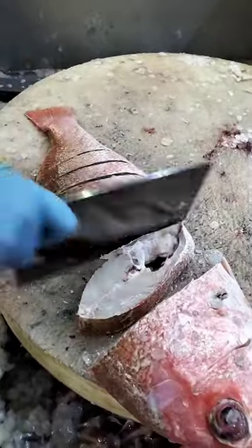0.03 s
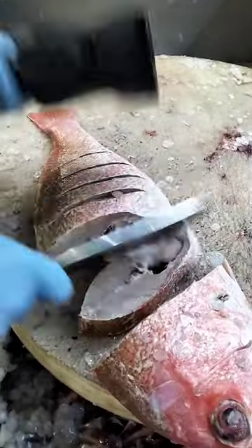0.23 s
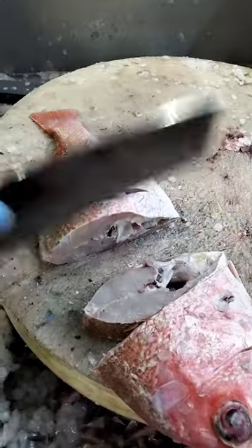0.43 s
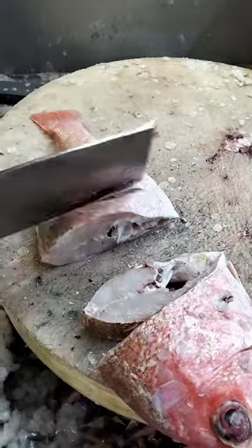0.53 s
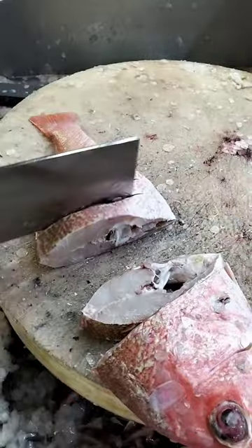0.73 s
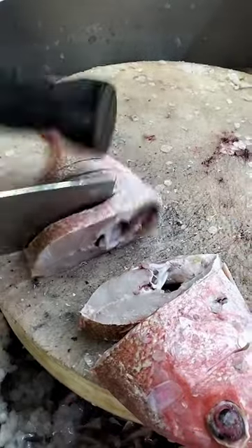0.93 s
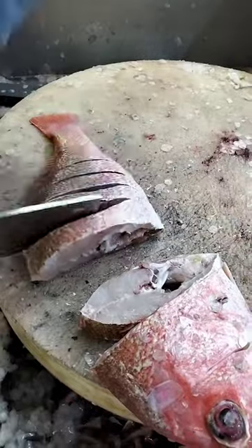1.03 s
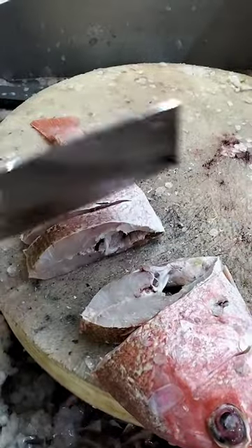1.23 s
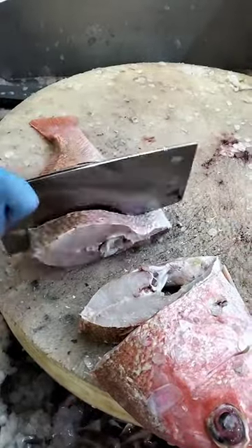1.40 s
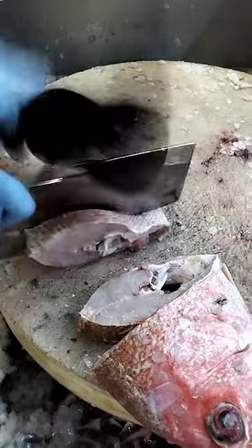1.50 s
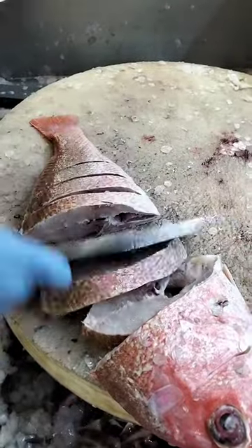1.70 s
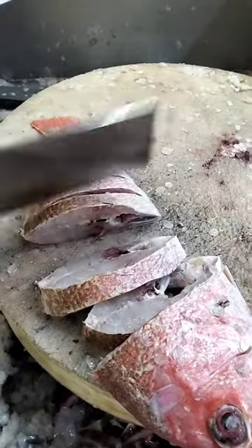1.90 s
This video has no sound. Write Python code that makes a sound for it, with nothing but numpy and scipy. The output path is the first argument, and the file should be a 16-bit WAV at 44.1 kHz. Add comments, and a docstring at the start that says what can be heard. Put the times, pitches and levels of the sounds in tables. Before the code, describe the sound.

Three hard chops crack through fish bone into a wooden block, ringing briefly in a small room

```python
"""Cleaver through a fish

A mallet drives a heavy cleaver through a fish on a thick wooden block, three times, in a small hard room.
Each blow cracks bone (noise bursts), knocks and rings blade and block (fading sines), carries low noise
that holds briefly and drops, and fills the room (fading noise). Between blows the blade slides over wet
scales (grainy noise, ticks). An earlier blow's tail opens the scene; the fish bumps softly (low noise).
Low rumble and hum lie behind; a limiter holds the peaks, then the top is cut.
"""
import sys
import numpy as np
from scipy import signal
from scipy.fft import rfft, irfft
from scipy.io import wavfile
from scipy.ndimage import uniform_filter1d, minimum_filter1d

SR = 44100
rng = np.random.default_rng(int(sys.argv[2]) if len(sys.argv) > 2 else 0)


def master_out(mix):
    """Clip the mix to full scale and print it as 16-bit PCM to the path in sys.argv[1]."""
    frames = np.transpose(np.atleast_2d(mix))
    ceiling = np.clip(frames, -1, 1)
    pcm = np.round(ceiling * 32767).astype(np.int16)
    wavfile.write(sys.argv[1], SR, pcm)


N = 85995
T = np.arange(N) / SR  # time in seconds
HZ = np.maximum(np.fft.rfftfreq(N, 1 / SR), 1)  # frequency of each spectrum bin, kept above 0 for logs

# Levels are relative: the layers add up, and colours and layer levels multiply.
# t60 is the time a sound takes to fade by 60 dB.

# Blows [t/s, level/dB, knock level/dB, blade level/dB, then one colour level/dB per BLOW_COLOUR_HZ];
# the colour depends on where the edge lands
BLOWS = [(0.2076, 1, 0.5, -10, 2.5, 2.8, -2, -5, -2.5, -7, -7.5),
         (0.9100, 1, -0.5, -3.5, -5, 1.1, -1, 1.5, -1.5, -0.5, -1.5),
         (1.5356, 0.018, 2, 1, 2.5, -1.8, 1.5, 1.5, 3.5, 2, 0.5)]
# Where the blow colours act [f/Hz]
BLOW_COLOUR_HZ = [90, 150, 350, 700, 1050, 1500, 4500]

# Dead knock of the blade bedding into the wood [f/Hz, level/dB, t60/s]
KNOCK_MODES = [(171, -4, 0.045), (228.6, -7.5, 0.066), (408, -9, 0.11), (668, -9, 0.067),
               (719.7, -9.5, 0.086), (907, -25, 0.055), (1036, -7, 0.052), (1254, -15, 0.06),
               (1549, -14, 0.042), (1716, -19, 0.1), (2258, -25.5, 0.1), (2360, -27, 0.07),
               (2888, -14.5, 0.027), (3240, -50, 0.021)]
# Contact noise of the knock [f/Hz, level/dB]
KNOCK_NOISE = [(30, 15), (120, -4), (300, -28), (700, 14), (1450, 5.5), (2000, -9), (3300, 2), (5000, -5.5),
               (16000, -64)]
KNOCK_NOISE_DB, KNOCK_NOISE_T60_S, KNOCK_RISE_S = -10.5, 0.042, 0.00038

# Low ring of block and bench [f/Hz, level/dB, t60/s]
BLOCK_MODES = [(74, -22, .9), (93, -7, .5), (134, -6, .36), (186, -12, .3), (219, -9, .38), (317, -10, .32),
               (393, -21, .35), (431, -20, .3), (571, -17, .35), (608, -26, .4), (642, -22, .37),
               (703, -19, .3), (733, -19, .29), (926, -29, .37)]
BLOCK_DB, BLOCK_RISE_S = -0.5, 0.012

# Ring of the cleaver [f/Hz, level/dB, t60/s]
BLADE_MODES = [(1014, -19, .25), (1064, -18, .4), (1089, -21, .38), (1141, -24, .38), (1227, -23, .27),
               (1315, -28, .28), (1675, -27, .28), (1696, -31, .28), (1803, -26, .22), (2562, -41, .3),
               (4018, -30, .19), (4170, -35, .15)]
BLADE_RISE_S = 0.0038

# Low noise under each blow, held level until about 90 ms, then dropped [f/Hz, level/dB]
HELD_NOISE_COLOUR = [(40, -14.5), (100, 1.5), (220, -1), (275, -9), (340, -3.5), (410, -5.5), (490, -15.5),
                     (700, -8), (900, -13.5), (1100, -20.5), (1500, -25), (3000, -45), (16000, -63)]
HELD_NOISE_DB, HELD_NOISE_S, HELD_NOISE_RISE_S, HELD_NOISE_RELEASE_S = -17, 0.087, 0.012, 0.0053

# Colour of the room's answer [f/Hz, level/dB per Hz]
ROOM_COLOUR = [(30, -49), (70, -20), (150, 2.5), (270, -1.5), (400, -0.5), (490, -6.5), (700, -7),
               (900, -8.5), (1100, -9.5), (1400, -14.5), (1750, -11.5), (2000, -20), (4200, -21.5),
               (6000, -32), (10000, -38.5), (15000, -37.5)]
# How long the room rings [f/Hz, t60/s]
ROOM_T60 = [(60, 1), (300, .5), (1000, 0.58), (2500, 0.36), (6000, 0.39), (15000, 0.25)]
ROOM_DB, ROOM_RISE_S = -16, 0.0039

# Bone and scales giving way [t/s, length/s, level/dB, tilt/dB per octave]
CRUNCHES = [(0.2053, .003, -21.5, -5), (0.9063, 0.0059, -13.5, -0.5), (1.5296, 0.0055, -14.5, -4.5)]
# Colour of the crunches before the tilt [f/Hz, level/dB]
CRUNCH_COLOUR = [(200, -2), (1500, 1.5), (4000, 2), (7000, -7), (10000, -7.5), (13000, -3), (16000, -6.5)]
CRUNCH_RISE_S, CRUNCH_RELEASE_S = 0.0034, 0.0016

# Wet blade sliding through flesh and over scales [t/s, rise/s, fall/s, level/dB]
SLIDES = [(0.24, 0.073, 0.07, -44), (0.65, 0.076, 0.099, -48.5), (0.77, 0.036, 0.39, -54.5),
          (1.17, 0.18, 0.15, -55)]
# Colour of the slides [f/Hz, level/dB]
SLIDE_COLOUR = [(500, -20), (2000, -2.5), (4200, 2), (5500, -3), (8400, -7), (12000, -8), (16000, -9.5)]
# The drawn blade singing faintly [f/Hz, boost level/dB]
SLIDE_RING = [(4460, 7.1)]
SLIDE_RING_WIDTH_HZ = 54  # distance from the centre where the boost in dB has halved
SLIDE_GRAIN_DB = 3.5

# Scales ticking against the edge [t/s, level/dB]
TICKS = [(0.474, -46), (0.5158, -44), (0.562, -52), (0.7882, -43), (0.8265, -37.5), (0.834, -44),
         (1.2724, -42.5), (1.357, -45), (1.4738, -45)]
# Colour of the ticks [f/Hz, level/dB]
TICK_COLOUR = [(400, 5), (1400, -4), (2000, -5), (3000, 4.5), (5000, -4.5), (8000, -9), (16000, -12)]
TICK_T60_S = 0.023

# Fading tail of an earlier blow at 0.0 s, then soft low bumps of the fish [t/s, rise/s, t60/s, level/dB]
TAIL_AND_BUMPS = [(0.0, 0.0031, 0.49, -28.5), (1.101, 0.021, 0.48, -30), (1.189, 0.019, .5, -38),
                  (1.33, 0.028, 0.79, -41)]
# Colour of the tail and the bumps [f/Hz, level/dB]
TAIL_AND_BUMP_COLOUR = [(30, -20), (70, 3.5), (130, 0), (220, -0.5), (500, -12), (1000, -16), (2000, -32.5),
                        (16000, -51.5)]

# Steady rumble [f/Hz, level/dB per Hz]
RUMBLE_COLOUR = [(25, -11), (45, -1), (80, -3), (160, -1), (263, -8), (545, -16), (800, -17.5), (1500, -22),
                 (2100, -27.5), (3500, -28.5), (4400, -26.5), (5500, -40), (7000, -39.5), (12000, -42.5),
                 (16000, -47)]
# Machine hum [f/Hz, level/dB]
HUM = [(73, -49), (97, -52), (393, -54), (786, -60), (1179, -65), (1572, -63)]
RUMBLE_DB, WAVER_DB = -43, 0.74  # the waver moves both rumble and hum

CEILING, LIMITER_S = 0.94, 0.0026  # peak limit (full scale = 1) and limiter window
TOP_HZ = 15700


def undb(db):
    """Turn decibels into a plain multiplier."""
    return 10 ** (np.asarray(db) / 20)


def unit(x):
    """Scale a sound to an average strength (rms) of 1."""
    return x / np.sqrt(np.mean(x ** 2))


def curve(points, hz):
    """Read a value between (Hz, value) points, on a log-frequency axis."""
    f, v = np.array(points, float).T
    return np.interp(np.log(hz), np.log(f), v)


def noise(colour, grain_db=0):
    """Spectrum of coloured noise of rms 1; grain boosts random samples into crackle."""
    grain = undb(grain_db * rng.exponential(size=N))
    white = rng.standard_normal(N) * grain
    coloured = irfft(rfft(white) * undb(curve(colour, HZ)), N)
    return rfft(unit(coloured))


def fade(t60):
    """Die away exponentially, by 60 dB in t60 seconds."""
    return np.exp(-np.log(1000) * T / t60)


def ramp(rise_s):
    """Rise in a straight line to full level, then stay there."""
    return np.minimum(T / rise_s, 1)


def swell(rise_s):
    """Rise quickly at first, then ever more slowly towards full level."""
    return 1 - np.exp(-T / rise_s)


def hold(length_s, release_s):
    """Stay at full level for a while, then release quickly."""
    return np.exp(-np.maximum(T - length_s, 0) / release_s)


def at(start, x):
    """Delay a sound to its start time."""
    silence = np.zeros(max(int(start * SR), 0))
    return np.concatenate([silence, x])[:N]


def ring(modes, colour, rise_s):
    """Add up a struck body's fading tones, which build up over a short push."""
    total = 0
    for k, (hz, db, t60) in enumerate(modes):
        level = (-1) ** k * undb(db + curve(colour, hz))  # every other tone is flipped
        total = total + level * fade(t60) * np.sin(2 * np.pi * hz * T)
    return swell(rise_s) * total


def blow(knock_db, blade_db, colour_db):
    """One impact: knock, held low noise, ring of block and blade, and room, all sharing one colour."""
    colour = list(zip(BLOW_COLOUR_HZ, colour_db))
    tint = undb(curve(colour, HZ))
    block = undb(BLOCK_DB) * ring(BLOCK_MODES, colour, BLOCK_RISE_S)
    blade = undb(blade_db) * ring(BLADE_MODES, colour, BLADE_RISE_S)
    return undb(knock_db) * knock(colour, tint) + held_noise(tint) + block + blade + room(tint)


def knock(colour, tint):
    """The blade bedding into wood: short dead tones plus a burst of contact noise."""
    contact = irfft(noise(KNOCK_NOISE) * tint, N) * fade(KNOCK_NOISE_T60_S)
    return ring(KNOCK_MODES, colour, KNOCK_RISE_S) + undb(KNOCK_NOISE_DB) * contact


def held_noise(tint):
    """Low noise under each blow that rises, stays level until about 90 ms, then drops."""
    low_noise = irfft(noise(HELD_NOISE_COLOUR) * tint, N)
    shape = ramp(HELD_NOISE_RISE_S) * hold(HELD_NOISE_S, HELD_NOISE_RELEASE_S)
    return undb(HELD_NOISE_DB) * low_noise * shape


def room(tint):
    """Dense reflections, made of noise; each octave dies away at its own rate."""
    wash = noise(ROOM_COLOUR) * tint
    octave = np.log2(np.clip(HZ, 2 ** 5, 2 ** 14))
    tail = 0
    for k in range(5, 15):  # octave bands centred on 32 Hz to 16384 Hz
        band = np.maximum(1 - abs(octave - k), 0)  # overlapping triangles
        tail = tail + irfft(wash * band, N) * fade(curve(ROOM_T60, 2. ** k))
    return undb(ROOM_DB) * tail * swell(ROOM_RISE_S)


def bone():
    """A few milliseconds of dense fractures that build up as the edge breaks through."""
    total = 0
    for start, length, db, tilt in CRUNCHES:
        slope = undb(tilt * np.log2(HZ / 4000))
        crackle = irfft(noise(CRUNCH_COLOUR) * slope, N)
        shape = ramp(CRUNCH_RISE_S) * hold(length, CRUNCH_RELEASE_S)
        total = total + at(start, undb(db) * crackle * shape)
    return total


def slides():
    """Grainy wet rubbing that swells and falls and makes the blade sing."""
    effort = sum(undb(db) * np.interp(T, [s, s + rise, s + rise + fall], [0, 1, 0])
                 for s, rise, fall, db in SLIDES)
    sing_db = sum(db / (1 + ((HZ - hz) / SLIDE_RING_WIDTH_HZ) ** 2) for hz, db in SLIDE_RING)
    return effort * irfft(noise(SLIDE_COLOUR, SLIDE_GRAIN_DB) * undb(sing_db), N)


def ticks():
    """Single scales snap against the edge as tiny fading bursts of noise."""
    bursts = sum(at(s, undb(db) * fade(TICK_T60_S)) for s, db in TICKS)
    return bursts * irfft(noise(TICK_COLOUR), N)


def tail_and_bumps():
    """Fading tail of an earlier blow, then soft low bumps of the fish, all made of low noise."""
    shape = sum(at(s, undb(db) * ramp(rise) * fade(t60)) for s, rise, t60, db in TAIL_AND_BUMPS)
    return irfft(noise(TAIL_AND_BUMP_COLOUR), N) * shape


def background():
    """Low rumbling noise and the steady tones of a machine, wavering slightly together."""
    slow = rfft(rng.standard_normal(N)) * (HZ < 8)  # only changes slower than 8 Hz
    waver = unit(irfft(slow, N))
    rumble = undb(RUMBLE_DB) * irfft(noise(RUMBLE_COLOUR), N)
    # sqrt(2) makes each level an rms level; each tone starts at a random phase
    hum = sum(undb(db) * np.sqrt(2) * np.sin(2 * np.pi * (hz * T + rng.random())) for hz, db in HUM)
    return (rumble + hum) * undb(WAVER_DB * waver)


def scene():
    """Three chops with the small noises of blade and fish over the background."""
    chops = sum(at(s, undb(db) * blow(knock_db, blade_db, colour_db))
                for s, db, knock_db, blade_db, *colour_db in BLOWS)
    mix = chops + bone() + slides() + ticks() + tail_and_bumps() + background()
    return mix[None]  # one channel


def record(dry):
    """Turn down around peaks with a fast look-ahead limiter, then cut the top."""
    size = max(int(LIMITER_S * SR), 2)
    needed = np.minimum(1, CEILING / (abs(dry) + 1e-9))
    gain = uniform_filter1d(minimum_filter1d(needed, size), size)  # lowest nearby gain, smoothed
    low_pass = signal.ellip(8, .2, 80, TOP_HZ, fs=SR, output="sos")  # .2 dB ripple, 80 dB cut
    return signal.sosfilt(low_pass, dry * gain)


dry = scene()
out = record(dry)
master_out(out)
```